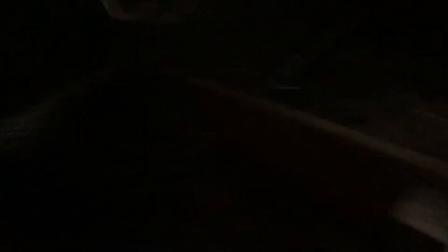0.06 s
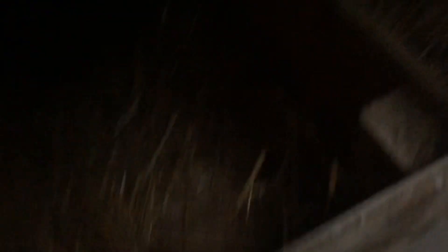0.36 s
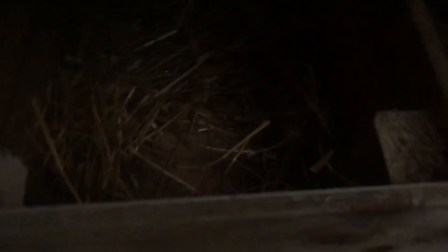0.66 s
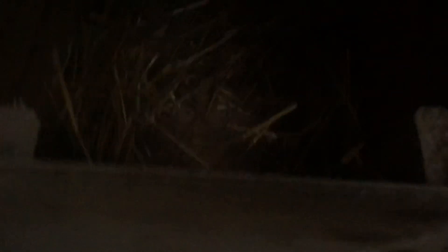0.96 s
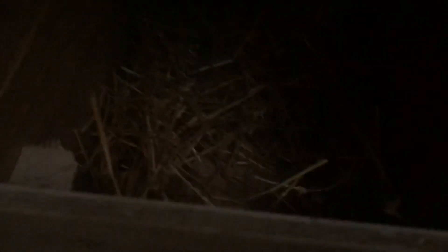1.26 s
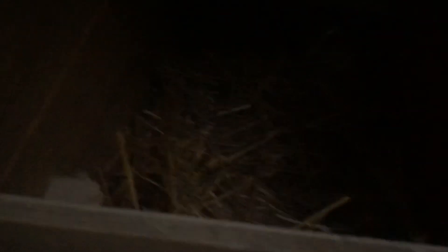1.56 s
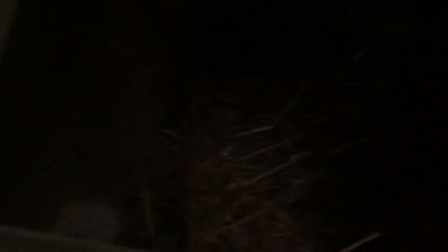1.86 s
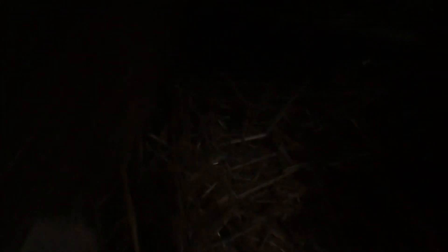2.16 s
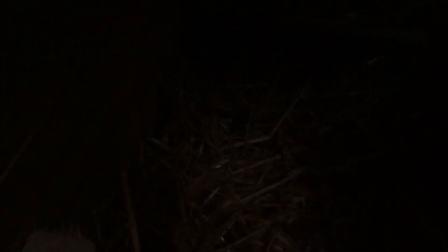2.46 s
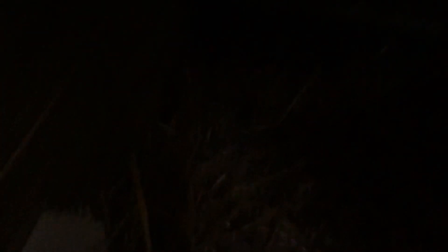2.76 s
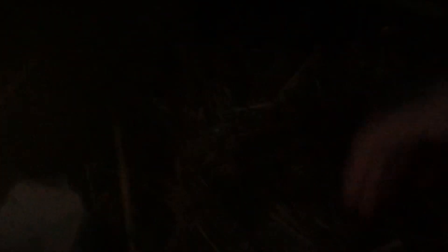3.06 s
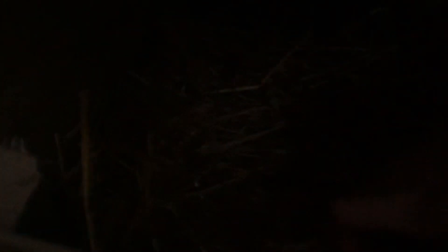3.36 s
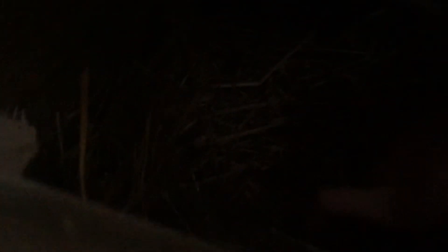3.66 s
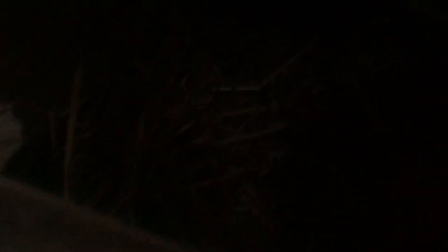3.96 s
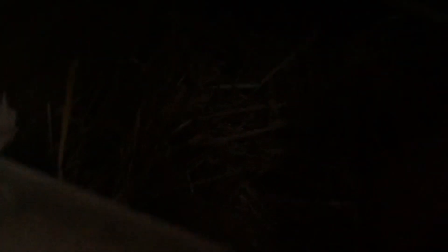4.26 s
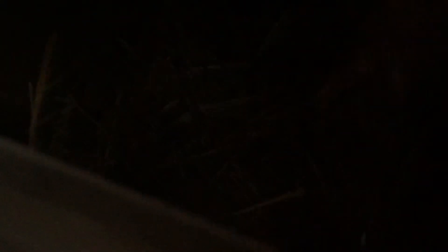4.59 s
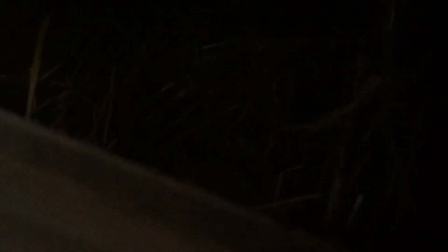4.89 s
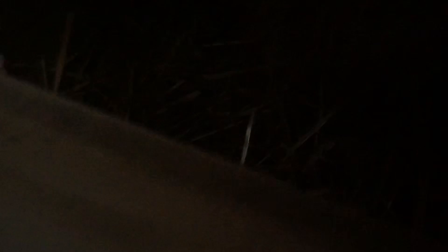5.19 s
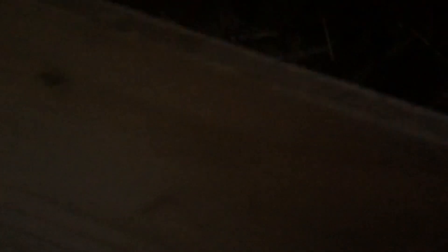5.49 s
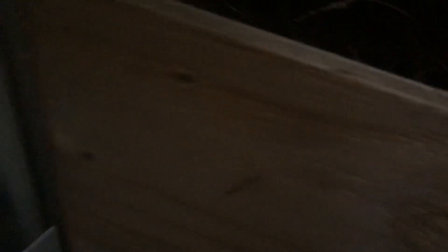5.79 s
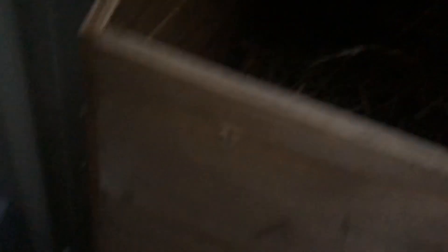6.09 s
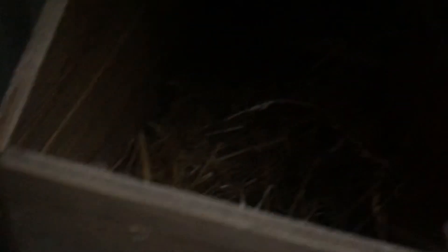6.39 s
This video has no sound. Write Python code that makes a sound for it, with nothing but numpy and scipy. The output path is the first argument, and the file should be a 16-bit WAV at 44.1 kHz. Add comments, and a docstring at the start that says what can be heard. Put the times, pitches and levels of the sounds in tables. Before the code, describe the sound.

Inside a quiet chicken coop, close clicks, creaks and soft thuds come from fingers shifting on the camera. After a lull with a few distant wooden knocks, a hand searches through dry straw, scraping and snapping stalks over a duller rustle and low rumble. The digging fades into light scuffs on the microphone. A low hum continues throughout, and small birds chirp faintly outside.

```python
"""Peering into a chicken coop

A handheld camera's case creaks, clicks and thuds as fingers slip, scuff and bump on it. Then a hand
digs through the dry straw of a nest box: stalks scrape and snap over a duller bedding. A low hum lies
under everything; outside, small birds whistle and far-off wood is knocked on a few times."""
import sys
import numpy as np
from scipy import signal
from scipy.fft import rfft, irfft, next_fast_len
from scipy.io import wavfile
from scipy.ndimage import map_coordinates

SR = 44100
rng = np.random.default_rng(int(sys.argv[2]) if len(sys.argv) > 2 else 0)


def unload_audio(sound):
    """Save the sound as a 16-bit wav file, at the path given as the first command line argument."""
    columns = np.transpose(np.atleast_2d(sound))
    # keep every value between -1 and 1, then stretch to whole-number steps
    steps = np.round(np.clip(columns, -1, 1) * 32767)
    wavfile.write(sys.argv[1], SR, steps.astype(np.int16))


N = 292779


def amp(db):
    """Decibels to gain."""
    return 10 ** (np.asarray(db) / 20)


def unit(x):
    """x at rms 1."""
    return x / np.sqrt(np.mean(x ** 2) + 1e-20)


def gain(points, hz):
    """Gain of an EQ curve of (Hz, dB) points on a log axis."""
    f, db = np.transpose(points)
    return amp(np.interp(np.log(hz + 1), np.log(f + 1), db))


def bell(x, centre, width):
    """A bell curve of height 1."""
    return np.exp(-((x - centre) / width) ** 2)


def clock():
    """The time of every sample."""
    return np.arange(N) / SR


def swell(s, half):
    """A rounded rise and fall around time s."""
    return np.exp(-np.minimum(np.abs((clock() - s) / half), 6) ** 3 / 2)


def wobble(rate):
    """A smooth random curve, rate knots a second."""
    return map_coordinates(rng.standard_normal(int(N * rate / SR) + 4), [clock() * rate])


def sine(hz):
    """A sine that follows a pitch curve."""
    return np.sin(2 * np.pi * np.cumsum(hz) / SR)


def filtered(x, response):
    """x times a response of frequency."""
    size = next_fast_len(len(x) + 8192)
    return irfft(rfft(x, size) * response(np.fft.rfftfreq(size, 1 / SR)), size)[:len(x)]


def coloured(x, points):
    """x through an EQ curve, at rms 1."""
    return unit(filtered(x, lambda hz: gain(points, hz)))


def noise(points):
    """Steady noise with the given spectrum."""
    return coloured(rng.standard_normal(N), points)


def add(track, s, x):
    """Mix x into the track from time s on."""
    part = track[max(round(s * SR), 0):][:len(x)]
    part += x[:len(part)]


def grains(rate, spread_db):
    """Random tiny impulses, rate a second, most weak and a few strong."""
    hits = (rng.random(N) < rate / SR) * rng.uniform(-0.96, 1, N)
    return unit(hits * amp(spread_db * np.minimum(rng.exponential(size=N), 3)))


def echoes(x, t60):
    """A diffuse tail of about the same energy as x."""
    t = np.arange(SR) / SR
    tail = rng.standard_normal(SR) * amp(-60 * t / t60)
    return signal.fftconvolve(x, tail / np.linalg.norm(tail))[:N]


# Swells of a faint low tone. Each row: middle in seconds, half length in seconds, level in dB.
MOAN_SWELLS = [(3.46, 0.055, -71), (3.98, 0.026, -67.5), (4.185, 0.039, -60), (4.36, 0.056, -69.5)]
# The colours of the rumble and the outdoor hiss. Each row: frequency in Hz, gain in dB.
RUMBLE_EQ = [(20, -46), (28, -19), (38, -18.5), (55, 0), (80, -0.5), (105, 2), (130, -0.5), (165, -8.5),
             (230, -22), (400, -45)]
AIR_EQ = [(120, -33), (200, -1.5), (249, -3), (394, -5), (659, -12.5), (806, -13), (867, -13), (1100, -15),
          (2250, -18.5), (2420, -23), (4770, -12.5), (6170, -23), (7970, -24), (14600, -32.5), (16000, -52)]


def background(stir, hum_hz=92, moan_hz=330):
    """A wavering hum, a faint passing tone, outdoor hiss and a rumble that grows with the digging."""
    hum = amp(-64.5 + 1.2 * wobble(3.1)) * np.sqrt(2) * sine(hum_hz + 1.23 * wobble(9.8))
    swells = sum(amp(db) * swell(s, half) for s, half, db in MOAN_SWELLS)
    moan = swells * np.sqrt(2) * sine(moan_hz + 4 * wobble(8.4))
    rumble = (amp(-61 + 0.201 * wobble(2.1)) + amp(-27.5) * stir) * noise(RUMBLE_EQ)
    air = amp(-70.5 + 0.36 * wobble(3.3)) * noise(AIR_EQ)
    return hum + moan + rumble + air


# The case slips under the fingers. Each row: time in seconds, peak in dB, hardness in dB
# (more treble, less bass).
CASE_SLIPS = [(0.0654, -21, 4), (.0878, -19.5, -2.5), (0.1158, -16, 0), (.1287, -21.5, 0),
              (.1371, -25.5, -4), (.1478, -31.5, -6), (.155, -27, 2), (0.1617, -31, -7), (0.194, -32, 17),
              (1.0655, -44.5, -13), (1.1094, -35.5, 18), (1.1235, -21.5, 11), (1.1758, -38.5, -17),
              (1.1791, -37, -11.5), (1.2173, -25.5, -2.5), (1.2253, -38, -14), (1.2858, -49, -8),
              (1.5906, -48.5, -29.5), (3.089, -54.5, -2.5), (4.6928, -40.5, -24)]
# The body of the case. Each row: frequency in Hz, gain in dB.
CASE_EQ = [(60, -22), (280, -6), (400, -5.5), (560, 1.5), (800, 4.5), (1050, -4), (1600, 1), (2500, 1.5),
           (4500, -12), (6500, -22.5), (8500, -19), (11000, -29.5), (13000, -40), (16000, -48)]
# Each grip colours its slips. Each row: start in seconds, then bass, treble and node gains in dB.
GRIP_TONES = [(0, 3.5, 0, 3.5), (1, 5.5, 0.5, -17), (1.15, 11, 6.5, -5.5), (1.25, 15, -8, 11.5)]


def creaks(lag_s=0.001824, slow_hz=250, edge_db=-9, edge_path=2.3, bite_from_db=-22, size=2048):
    """Each slip sends a bending wave through the case: treble arrives first, so the click chirps down."""
    out, hz = np.zeros(N), np.fft.rfftfreq(size, 1 / SR)
    phase = 2 * np.pi * np.cumsum(lag_s * 1000 / (hz + slow_hz)) * hz[1]
    bass = 1 / (1 + (hz / 700) ** 3)
    treble = 1 - 1 / (1 + (hz / 3500) ** 4)
    nodes = bell(hz, 1250, 220) + 0.46 * bell(hz, 2950, 220)  # the grip decides how these are driven
    main_mode = bell(hz, 2100, 700)
    for (s, db, hard_db), place in zip(CASE_SLIPS, rng.uniform(0.814, 1.216, len(CASE_SLIPS))):
        _, bass_db, treble_db, node_db = GRIP_TONES[sum(s >= grip[0] for grip in GRIP_TONES[1:])]
        tone_db = (bass_db - 0.66 * hard_db) * bass + (treble_db + hard_db) * treble + node_db * nodes
        bite_db = 0.6 * max(db - bite_from_db, 0) * main_mode  # strong slips drive the panel's main mode
        colour = gain(CASE_EQ, hz) * amp(tone_db + bite_db)
        # A duller copy returns from the edge.
        edge = amp(edge_db) / (1 + hz / 2500) * np.exp(-1j * phase * edge_path * place)
        click = np.roll(irfft(colour * (np.exp(-1j * phase) + edge)), size // 2)
        add(out, s - size / 2 / SR, amp(db) * click / np.abs(click).max())
    return out + amp(-20) * echoes(out, t60=0.039)


# Skin scuffs the case. Each row: middle in seconds, half length in seconds, level in dB, hiss gain in dB.
SCUFF_STROKES = [(0.158, .015, -45.5, -5), (0.201, .026, -58, -7), (.263, .014, -56, -11),
                 (.919, 0.0055, -62.5, 2), (0.956, 0.025, -56.5, 3.5), (1.19, 0.093, -62.5, -8),
                 (1.309, 0.046, -64, -1), (1.597, 0.031, -65.5, -2.5), (1.688, 0.025, -61, -15.5),
                 (4.283, 0.03, -57.5, 11), (6.172, 0.15, -62, -6), (6.447, 0.021, -52.5, 1),
                 (6.62, 0.017, -59.5, 6.5)]
# The colour of rubbing skin. Each row: frequency in Hz, gain in dB.
SKIN_EQ = [(100, 9), (350, 5.5), (750, 4.5), (1500, -5), (3000, -3), (8000, -5.5), (12000, -12),
           (16000, -22)]


def scuffs():
    """Fingers slide in short strokes of very many tiny slips."""
    rub = unit(coloured(grains(rate=5800, spread_db=-3), SKIN_EQ) + amp(-6) * noise(SKIN_EQ))
    hiss = filtered(rub, lambda hz: hz ** 2 / (hz ** 2 + 2500 ** 2))
    return sum(amp(db) * swell(s, half) * (rub + (amp(hiss_db) - 1) * hiss)
               for s, half, db, hiss_db in SCUFF_STROKES)


# Far blows. Each row: start in seconds, level in dB, length of the first reflections in seconds,
# frequency in Hz that the struck spot favours.
WOOD_BLOWS = [(.331, -58.5, 0.044, 790), (2.355, -54.5, 0.059, 650), (2.551, -56, 0.072, 218),
              (2.725, -56, 0.04, 278), (6.432, -55, 0.027, 1100)]
# The wood's resonances. Each row: centre in Hz, width in Hz, gain in dB.
BOARD_MODES = [(212, 41, 8.5), (283, 80, 8), (560, 57, 9), (667, 29, 8.5), (760, 26, 5.5), (920, 190, 1),
               (1143, 150, -3.5), (1358, 70, -1.5), (1580, 115, -5), (1880, 130, -14), (2315, 190, -15),
               (2780, 180, -16.5)]


def knocks(t60=0.18, dull_hz=1900, scatter=0.3, favour_db=3.5):
    """Far blows on wood arrive as a dense cluster of reflections, much the same each time."""
    out, t = np.zeros(N), np.arange(SR // 2) / SR
    path = rng.standard_normal(len(t))
    attack = (1 - np.exp(-t / 0.0021)) * (1 + 0.35 * np.exp(-t / 0.015))

    def board(hz):
        return sum(amp(db) / (1 + (2 * (hz - centre) / width) ** 2) for centre, width, db in BOARD_MODES)

    for s, db, hold, spot_hz in WOOD_BLOWS:
        cluster = path + scatter * rng.standard_normal(len(t))
        wood = unit(filtered(cluster, lambda hz: board(hz) * amp(favour_db * bell(hz / spot_hz, 1, 0.14))))
        body = filtered(wood, lambda hz: 1 / (1 + (hz / dull_hz) ** 4))
        treble = (wood - body) * amp(13 - 60 * t / 0.34)  # starts bright, dies first
        fade = amp(-60 * np.maximum(t - hold, 0) / t60)
        add(out, s, amp(db) * attack * fade * (body + treble))
    return out


def whistle(shape, waver, fade_s=0.0014):
    """One bird note along rows of (seconds, Hz, dB, waver share); fast pitch waver makes it hoarse."""
    times, *columns = np.transpose(shape)
    t = np.arange(times[0], times[-1], 1 / SR)
    hz, db, hoarse = [np.interp(t, times, column) for column in columns]
    pitch = hz * (1 + hoarse * waver[rng.integers(N // 2):][:len(t)])
    fade = np.clip(np.minimum(t - times[0], times[-1] - t) / fade_s, 0, 1)
    return amp(db) * fade * sine(pitch)


# A thin high chip, repeated. Each row: start in seconds, level in dB.
CHIP_CALLS = [(0.525, -55.5), (2.616, -54), (5.705, -61.5)]
# Its upward flick and sagging hold. Each row: seconds into the call, pitch in Hz, gain in dB,
# waver as a share of the pitch.
CHIP_SHAPE = [(0, 5220, -8, 0.012), (.006, 6780, 2, 0.012), (.013, 7600, -9, .01),
              (.038, 7340, -16.5, 0.0091)]
# Plain faint whistles. Each row: start and length in seconds, first and last pitch in Hz, level in dB.
PLAIN_CALLS = [(0.766, 0.034, 4080, 3990, -66), (1.017, 0.39, 2030, 1953, -76.5),
               (2.602, 0.029, 4100, 4020, -68), (3.258, .04, 3850, 4260, -70),
               (3.307, .055, 4460, 4550, -71), (3.737, 0.2, 3740, 3870, -74),
               (6.165, 0.034, 2734, 2730, -67), (6.245, .022, 2760, 2810, -66)]
# One call climbs, levels off and turns hoarse. Each row: time in seconds, pitch in Hz, level in dB,
# waver as a share of the pitch.
HOARSE_CALL = [(5.624, 1970, -81, .02), (5.72, 2317, -64, 0.027), (5.8, 2476, -68.5, .04),
               (5.88, 2634, -62.5, 0.068), (5.99, 2570, -70.5, 0.084)]


def birds(plain_waver=0.014):
    """Gliding whistles smeared by the trees around; the far chips are heard only as echoes."""
    near, far = np.zeros(N), np.zeros(N)
    waver = wobble(260)
    for s, db in CHIP_CALLS:
        add(far, s, amp(db) * whistle(CHIP_SHAPE, waver))
    for s, length, start_hz, end_hz, db in PLAIN_CALLS:
        glide = [(0, start_hz, db, plain_waver), (length, end_hz, db, plain_waver)]
        add(near, s, whistle(glide, waver, fade_s=0.0067))
    add(near, HOARSE_CALL[0][0], whistle(HOARSE_CALL, waver))
    return near + amp(-1) * echoes(near, t60=1) + amp(-2) * echoes(far, t60=0.062) + echoes(far, t60=0.85)


# A finger pad bumps the case. Each row: start in seconds, level in dB, pitch in Hz, t60 in seconds.
FINGER_BUMPS = [(0.917, -38.5, 385, 0.022), (1.22, -47, 416, 0.09), (1.591, -37.5, 334, 0.041),
                (4.692, -30, 313, 0.019), (4.765, -32.5, 257, 0.017), (6.442, -45, 217, 0.14)]


def bumps(rise_s=0.0019, overtone_ratio=1.74, overtone_db=-7):
    """A soft contact wakes only the two lowest modes of the case; the upper one dies sooner."""
    out, t = np.zeros(N), np.arange(SR // 5) / SR
    for s, db, pitch_hz, t60 in FINGER_BUMPS:
        fade = amp(-60 * t / t60)
        phase = 2 * np.pi * pitch_hz * t
        ring = fade * np.sin(phase) + amp(overtone_db) * fade ** 2 * np.sin(overtone_ratio * phase)
        add(out, s, amp(db) * (1 - np.exp(-t / rise_s)) * ring)
    return out


TOUCH_FROM_S = 3.27  # from here on the straw keeps stirring
# The featured stalk snaps. Each row: start in seconds, peak in dB, pitch in Hz.
STALK_SNAPS = [(3.068, -56.5, 6500), (3.1447, -40.5, 5160), (3.1706, -40, 5100), (3.1762, -34.5, 6160),
               (3.206, -41.5, 5300), (3.3628, -46.5, 5240), (3.5392, -38.5, 8700), (3.9288, -32.5, 7300),
               (4.1554, -32, 7600), (4.4532, -25, 9550), (4.771, -33, 7850), (4.9572, -24, 6960),
               (5.0044, -27, 10100), (5.0152, -29, 8600), (5.3037, -32.5, 3840), (5.3277, -25, 8400),
               (5.4639, -38.5, 6040), (5.776, -43, 2800), (6.0202, -46.5, 3370), (6.093, -50.5, 2360),
               (6.2192, -51, 1960)]


def snaps(stir, rise_s=0.00026, tick_db=3, ring_cycles=170):
    """A breaking stalk ticks and rings at its own pitch, thick ones longer; the nest box answers."""
    out, t = np.zeros(N), np.arange(SR // 10) / SR
    attack = 1 - np.exp(-t / rise_s)
    tick = amp(tick_db - 60 * t / 0.0021)
    for s, db, pitch in list(STALK_SNAPS) + small_snaps(stir):
        ring = amp(-60 * t * pitch / ring_cycles)
        crack = rng.standard_normal(len(t)) * attack * (tick + ring)
        burst = filtered(crack, lambda hz: 1j * hz * pitch / (pitch ** 2 - hz ** 2 + 1.1j * hz * pitch))
        add(out, s, amp(db) * burst / np.abs(burst).max())
    return out + amp(-9) * echoes(out, t60=0.085)


def small_snaps(stir, count=40, over_rustle_db=8.5, spread_db=3, typical_hz=7070):
    """Weaker stalks break at random while the straw stirs: more rows of (start, peak, pitch)."""
    times = rng.uniform(TOUCH_FROM_S, (N - 1) / SR, count)
    force, thinness = rng.standard_normal((count, 2)).T
    rustle_db = 20 * np.log10(stir[(times * SR).astype(int)] + 1e-9)
    peaks_db = rustle_db + over_rustle_db + spread_db * force
    return list(zip(times, peaks_db, typical_hz * np.exp(0.11 * thinness)))


# The hand first brushes the straw. Each row: middle in seconds, half length in seconds, level in dB.
HAND_BRUSHES = [(3.176, 0.038, -57.5), (3.467, 0.036, -58), (3.755, 0.054, -60)]
# Then it digs through the nest. Each row: time in seconds, level in dB before the dig's boost.
DIG_LEVELS = [(3.87, -73), (3.94, -51), (4.02, -54), (4.11, -46.5), (4.25, -44.5), (4.37, -48),
              (4.46, -44.5), (4.53, -48.5), (4.98, -48.5), (5.11, -44.5), (5.25, -54.5), (5.35, -50),
              (5.44, -63.0), (5.58, -75.5)]


def stirring(dig_boost_db=1.5, dig_fade_s=0.03, touch_db=-67.5, touch_rise_s=0.08, sag_db_per_s=3):
    """How hard the hand stirs the straw, as a gain: brushes, the long dig and a light, fading stir."""
    t = clock()
    since_touch = t - TOUCH_FROM_S
    touch = np.clip(since_touch / touch_rise_s, 0, 1) * amp(touch_db - sag_db_per_s * since_touch)
    times, levels_db = np.transpose(DIG_LEVELS)
    fade = np.clip(np.minimum(t - times[0], times[-1] - t) / dig_fade_s + 1, 0, 1)
    dig = fade * amp(np.interp(t, times, levels_db) + dig_boost_db)
    brush_power = sum((amp(db) * swell(s, half)) ** 2 for s, half, db in HAND_BRUSHES)
    return np.sqrt(touch ** 2 + dig ** 2 + brush_power)


def stalks(count=7):
    """Stalks of different thickness each crackle in a band of their own, in separate clumps."""
    out = np.zeros(N)
    for pitch_hz in np.geomspace(1800, 14000, count):
        ticks = grains(rate=900, spread_db=3.5) * amp(6 * np.tanh(wobble(35)))
        out += filtered(ticks, lambda hz: bell(np.log((hz + 1) / pitch_hz), 0, 0.34))
    return out


# The colours of crisp straw and of the pressed nest. Each row: frequency in Hz, gain in dB.
STRAW_EQ = [(880, -8), (1500, -6.5), (1940, -3), (2510, -6), (3250, -0.5), (3690, -1.5), (4160, 0.5),
            (11400, 2.5), (15100, -7.5), (16000, -16)]
BEDDING_EQ = [(120, -2), (280, 2), (550, 0.5), (1100, 0.5), (2000, -5.5), (3200, -1), (7000, -48)]


def straw(stir, bed_db=-63.5, reference_stir_db=-43.5, bed_db_per_db=0.57, deeper_db_per_s=2.5):
    """Stalks scrape past each other; the pressed bedding adds a duller rustle as the hand digs deeper."""
    clumps = amp(0.5 * wobble(45))
    rustle = amp(-4.5) * coloured(stalks(), STRAW_EQ) + amp(-4) * noise(STRAW_EQ)
    bedding = coloured(grains(rate=3000, spread_db=2), BEDDING_EQ)
    dig_start, dig_end = DIG_LEVELS[0][0], DIG_LEVELS[-1][0]
    dug_s = np.clip(clock(), dig_start, dig_end) - dig_start
    bed_gain = amp(bed_db + deeper_db_per_s * dug_s) * (stir / amp(reference_stir_db)) ** bed_db_per_db
    return clumps * (stir * rustle + bed_gain * bedding)


def scene():
    """Case, nest and outdoors, all at one microphone."""
    stir = stirring()
    handling = creaks() + bumps() + scuffs()
    nest = straw(stir) + snaps(stir)
    return (handling + nest + knocks() + birds() + background(stir))[None]


def record(dry, low_hz=36, top_hz=15900):
    """The small microphone loses the deepest bass; the camera keeps nothing above its band limit."""
    return np.array([filtered(channel, lambda hz: (1 - 1 / (1 + (hz / low_hz) ** 6)) * (hz < top_hz))
                     for channel in dry])


dry = scene()
out = record(dry)
unload_audio(out)
```